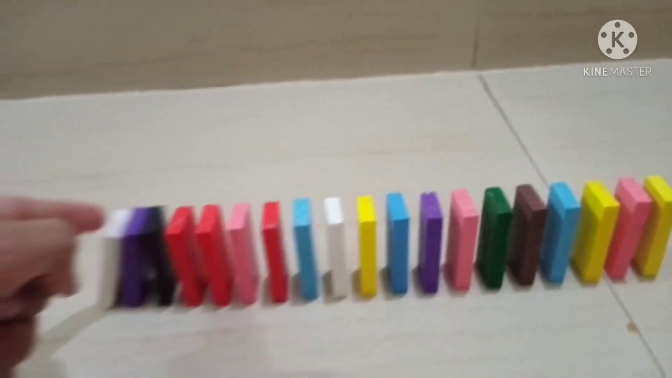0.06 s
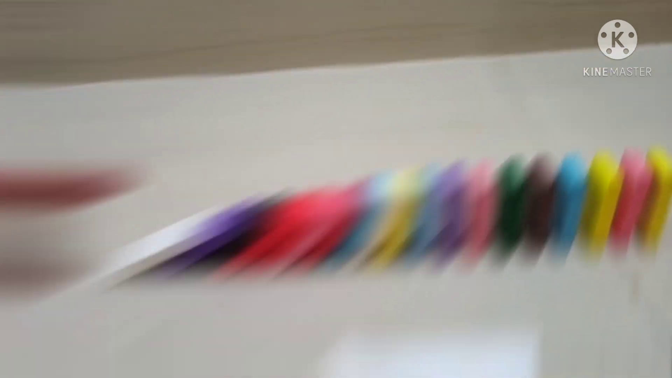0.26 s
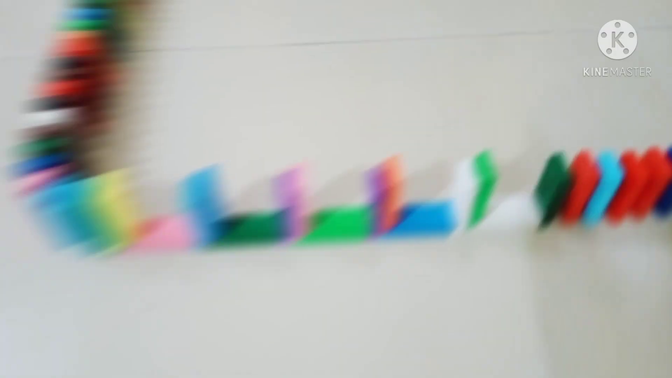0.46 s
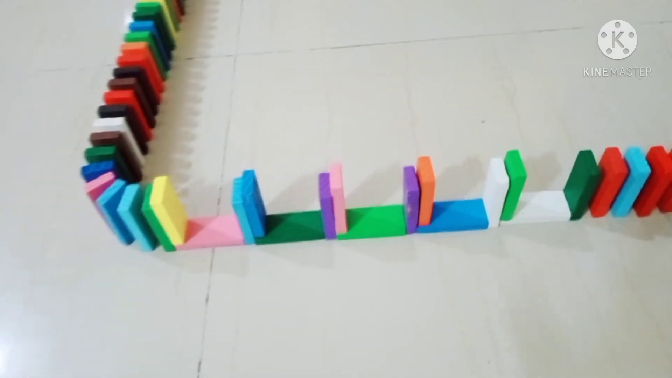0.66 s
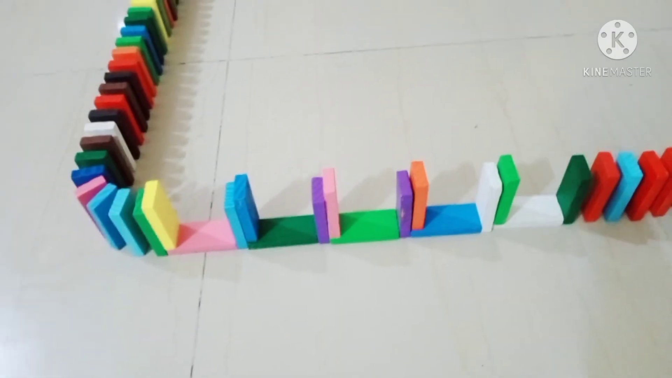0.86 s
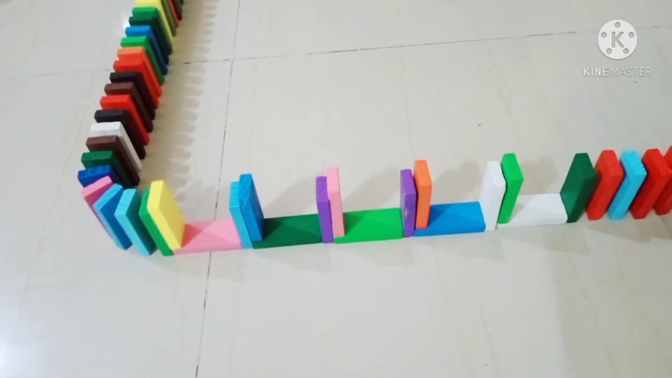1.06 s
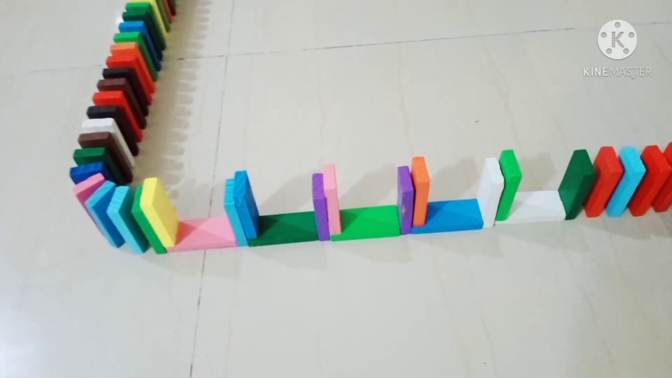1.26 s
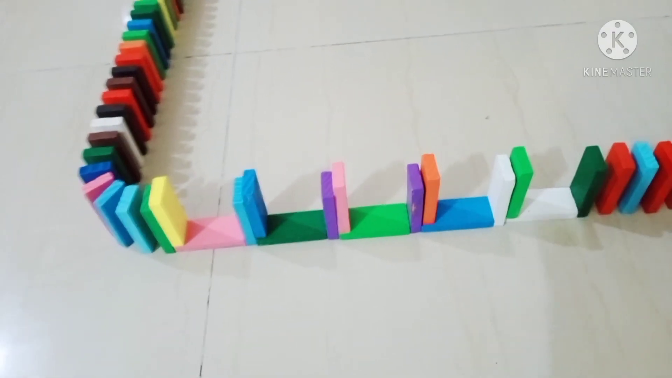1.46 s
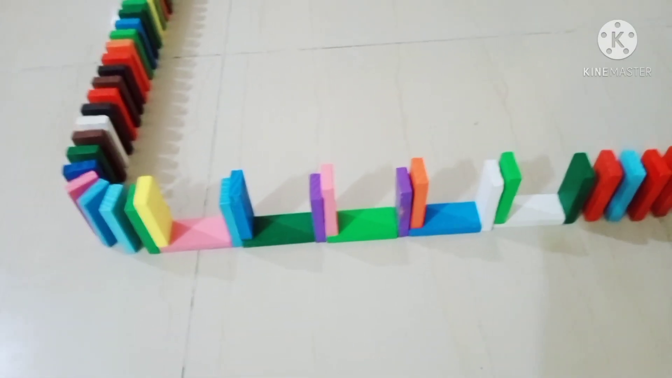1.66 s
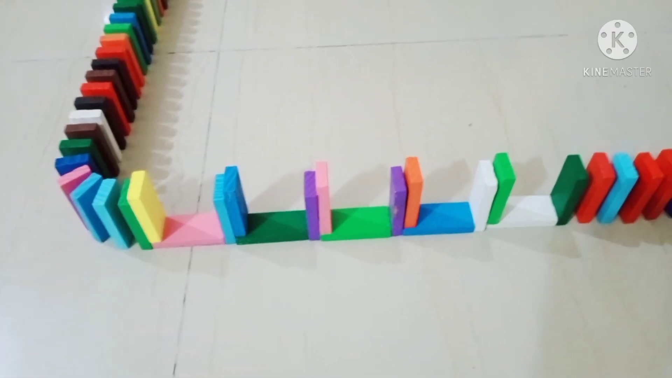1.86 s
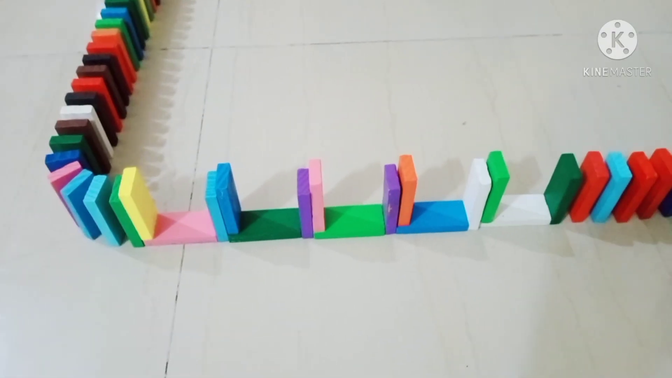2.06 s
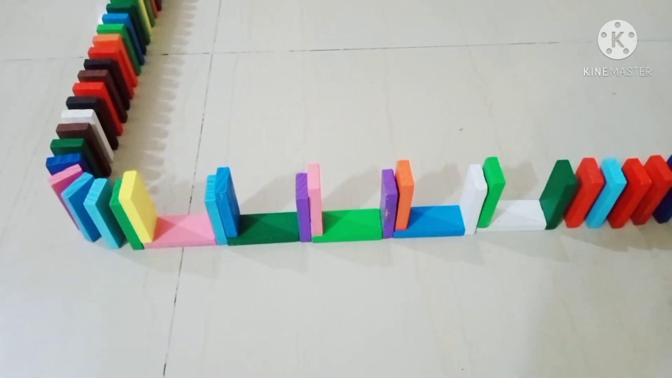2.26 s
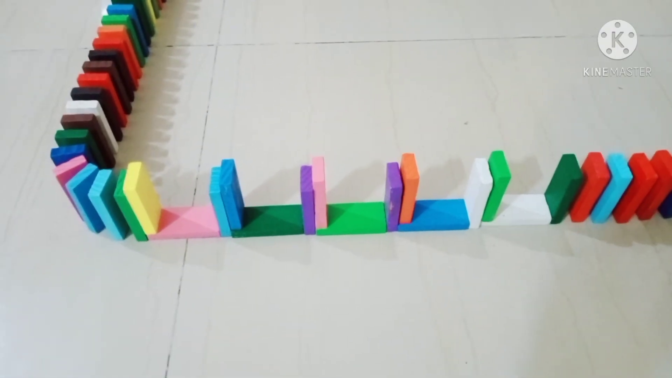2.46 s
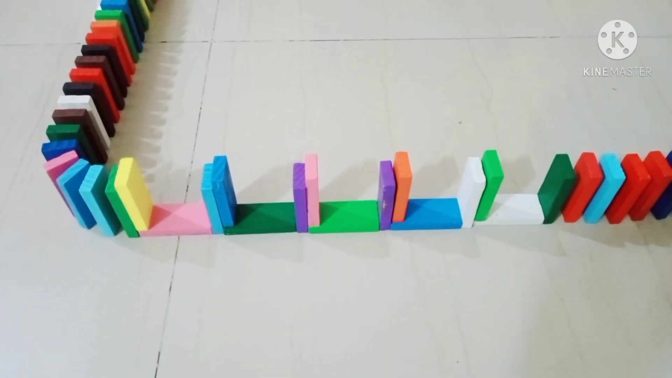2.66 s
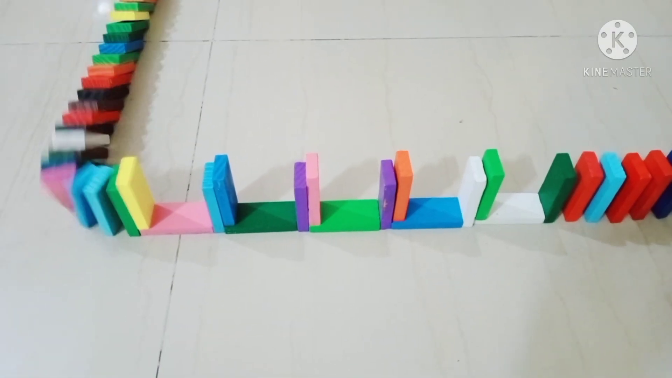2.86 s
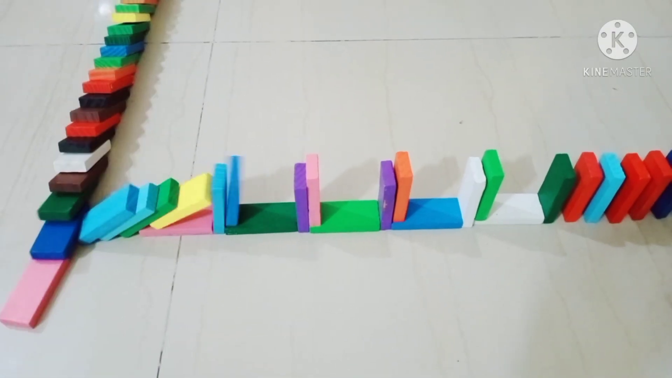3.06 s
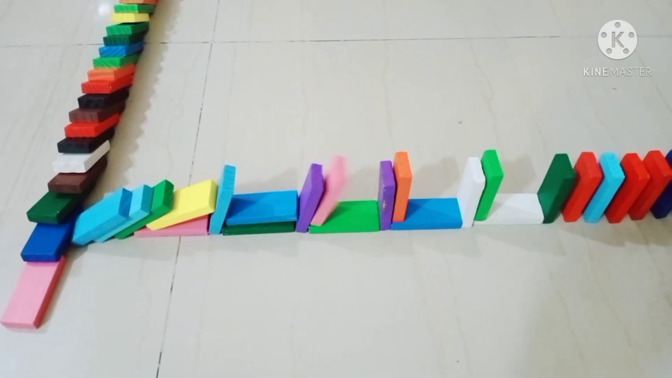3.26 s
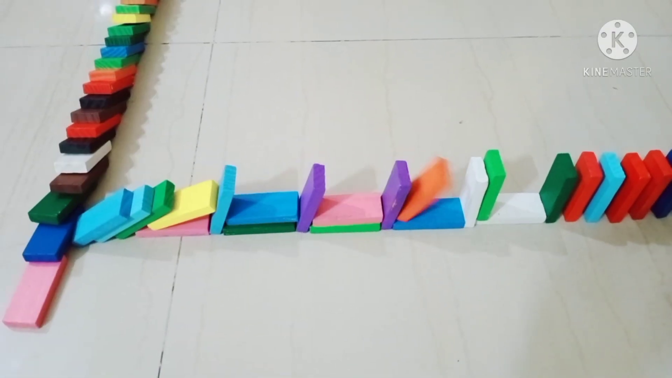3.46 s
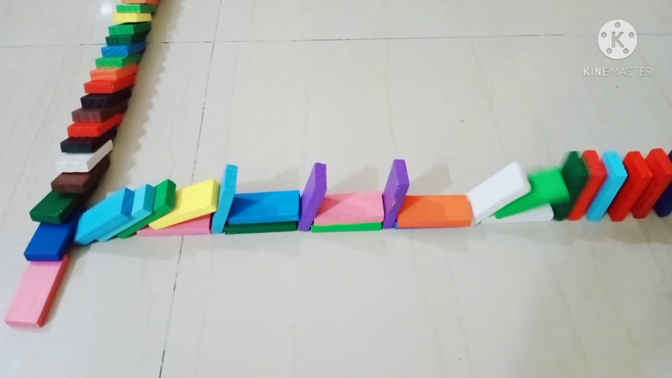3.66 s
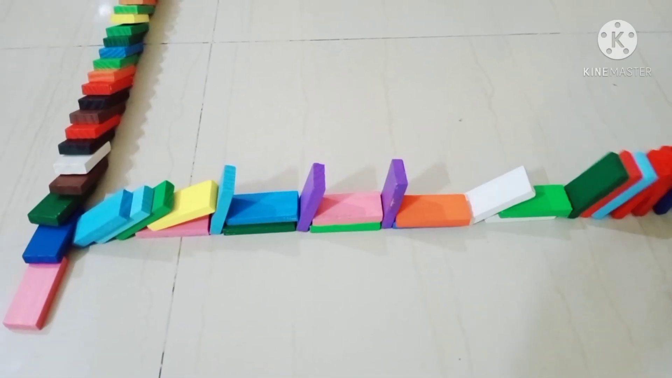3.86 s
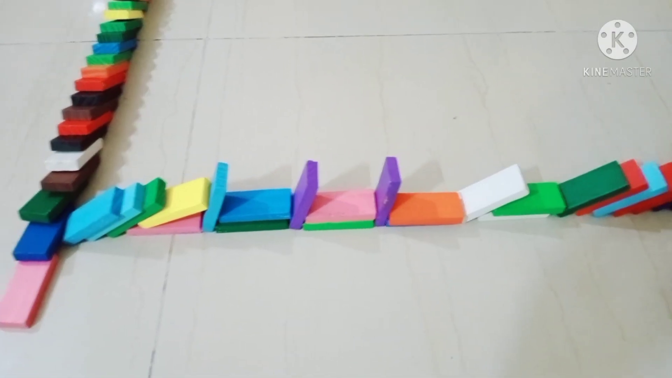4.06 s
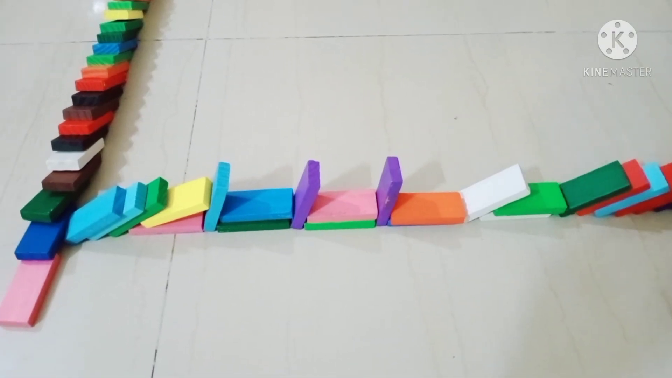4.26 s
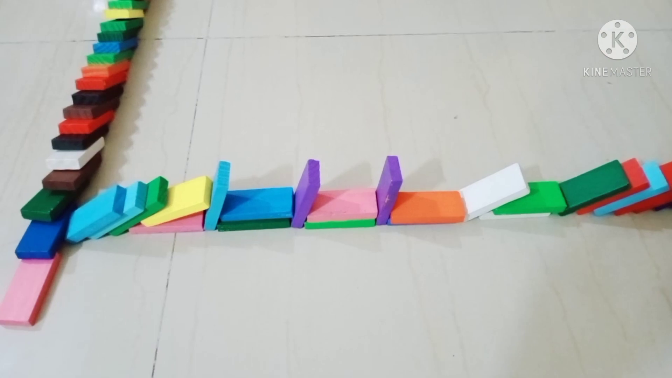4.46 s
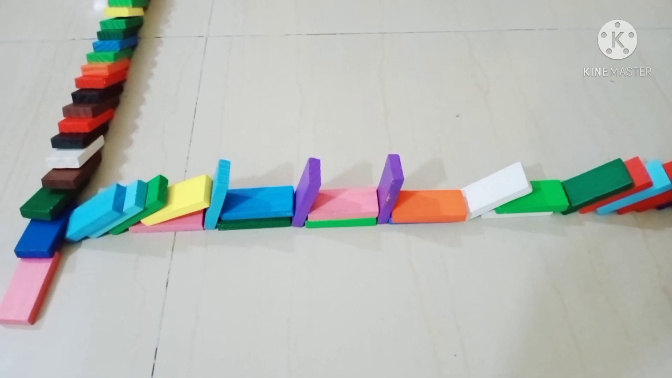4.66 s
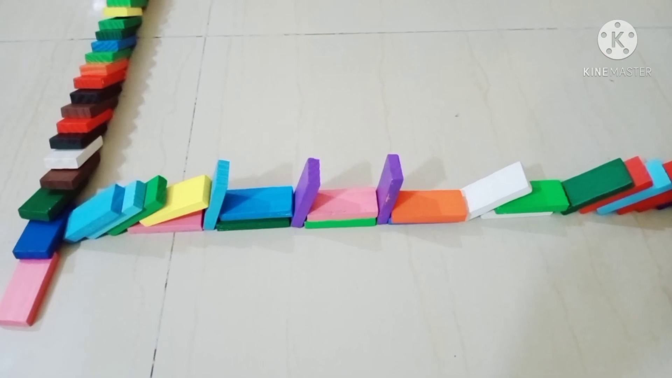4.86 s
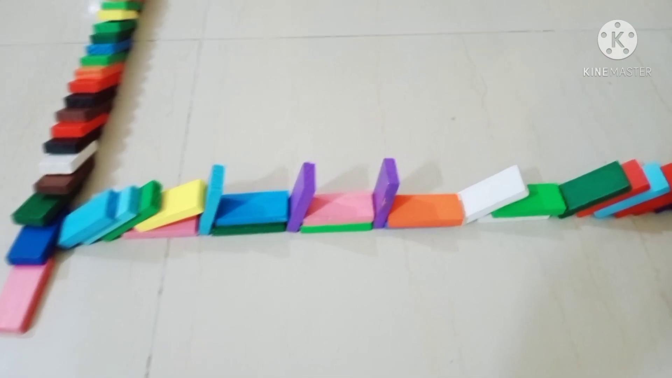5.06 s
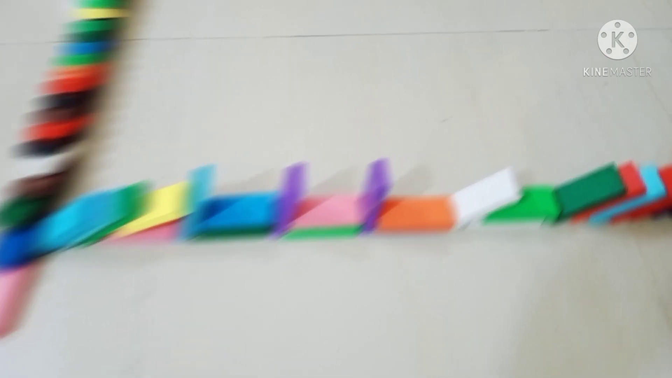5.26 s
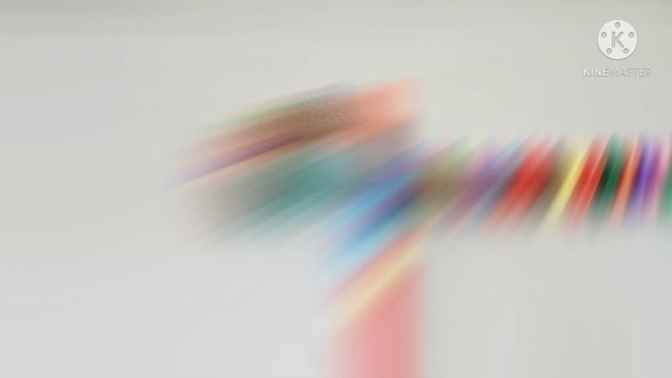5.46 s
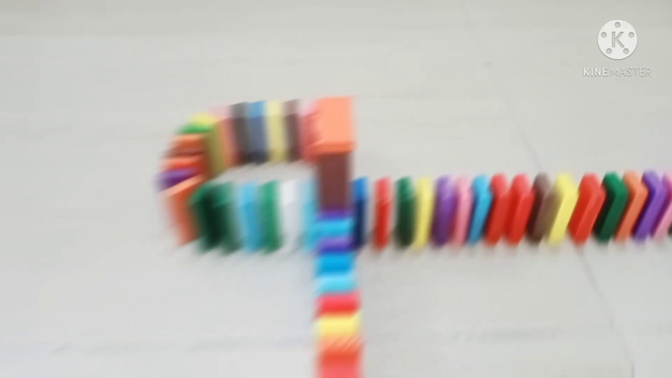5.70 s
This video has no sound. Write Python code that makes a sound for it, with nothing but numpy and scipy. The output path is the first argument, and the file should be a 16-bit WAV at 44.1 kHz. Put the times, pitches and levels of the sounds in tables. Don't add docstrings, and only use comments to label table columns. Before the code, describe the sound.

Three quick runs of sharp plastic domino clicks ring in a bare tiled room, separated by near-quiet, with one hard microphone knock.

```python
import sys
import numpy as np
from scipy import signal
from scipy.fft import rfft, irfft
from scipy.io import wavfile
from scipy.ndimage import uniform_filter1d

SR = 44100
rng = np.random.default_rng(int(sys.argv[2]) if len(sys.argv) > 2 else 0)


def generate_wav(sig):
    pcm = np.round(np.clip(np.atleast_2d(sig).T, -1, 1) * 32767).astype(np.int16)
    wavfile.write(sys.argv[1], SR, pcm)


def voltage_ratio(level):
    return 10 ** (np.asarray(level, float) / 20)


N = 252693
TIME = np.arange(N) / SR
CUT_S = .5095

# f/Hz, level/dB
SHEEN = [(5000, -32), (6500, -17), (7800, -5.5), (8800, -1.5), (10300, -14.5), (12000, -28.5), (15000, -38),
         (16500, -44.5)]
# f/Hz, level/dB
FAR_BODY = [(300, -12.5), (1000, -15), (1700, -4), (2600, -0.5), (3800, -8), (5000, -13.5), (8000, -6.5)]
# f/Hz, level/dB
ROW_BODY = [(300, -23.5), (1500, -15.5), (3500, -4), (5500, -4), (8000, -3), (11000, -20), (14000, -29)]


def shape(x, points):
    hz, db = np.transpose(points)
    log_hz = np.log(np.linspace(1, SR / 2, 1025))
    log_gain = np.interp(log_hz, np.log(hz), db) * np.log(10) / 20
    cepstrum = irfft(log_gain)
    cepstrum[1:1024] *= 2
    cepstrum[1025:] = 0
    return signal.fftconvolve(x, irfft(np.exp(rfft(cepstrum))))[:len(x)]


def band(x, lo_hz, hi_hz):
    y = signal.sosfilt(signal.butter(2, [lo_hz, hi_hz], "bandpass", fs=SR, output="sos"), x)
    return y / np.std(y)


def gains(rows):
    s, db = np.transpose(rows)
    inside = np.clip(np.minimum(TIME - s[0], s[-1] - TIME) / .02, 0, 1)
    return inside * voltage_ratio(np.interp(TIME, s, db))


def swell(peak_s, rise_s, fall_s, db):
    return voltage_ratio(db - 20 * np.maximum((peak_s - TIME) / rise_s, (TIME - peak_s) / fall_s))


def walk(rate):
    k = int(SR / rate)
    steps = np.repeat(rng.standard_normal(N // k + 1), k)
    w = uniform_filter1d(uniform_filter1d(steps, k), k)[:N]
    return w / np.std(w)


def ring(t, hz, t60, phase):
    build = 1 - np.exp(-t / .0003)
    return build * np.exp(-np.log(1000) * t / t60) * np.sin(2 * np.pi * (hz * t + phase))


def burst(sizes, length_s, colour):
    envelope = signal.lfilter([1], [1, -np.exp(-1 / (length_s * SR))], sizes)
    return shape(envelope * np.sign(rng.standard_normal(N)), colour)


def blows():
    # t/s, peak/dB, main mode f/Hz, upper mode f/Hz, upper level/dB re peak
    first_row = [(0.0827, -49, 10310, 10510, -8.5), (0.086, -39.5, 8400, 10510, -9.0),
                 (0.0918, -52.0, 8400, 10510, -11), (0.1146, -38.5, 10300, 10400, -9.5),
                 (0.1269, -50.0, 9710, 10510, 0.0), (0.159, -32.5, 9750, 13000, -13.5),
                 (0.173, -39.5, 9700, 13090, -8.5), (0.199, -35, 9650, 10510, -6.0),
                 (0.2279, -30, 9550, 13000, -7.0), (0.2446, -51, 9400, 12580, -20),
                 (0.2502, -37, 9860, 14660, -11), (0.2583, -22, 9700, 14710, -23),
                 (0.2657, -41, 10000, 11090, -8.5), (0.2748, -25, 8900, 11150, 2),
                 (0.2866, -30.5, 9800, 11130, -5.5), (0.2974, -32, 8700, 11180, -17),
                 (0.304, -22.5, 9700, 11200, -12.5), (0.3139, -48, 9840, 10680, -14.0),
                 (0.318, -20, 8900, 11240, -7), (0.322, -29, 8300, 10570, -9.0),
                 (0.3355, -14, 10200, 10800, -5), (0.339, -23, 9300, 11400, 1),
                 (0.3567, -21.5, 10300, 10570, 0.5), (0.3655, -18, 9100, 11930, -9.5),
                 (0.3702, -18, 9100, 10510, -13.0), (0.373, -15.5, 9170, 10510, -23),
                 (0.396, -19, 8700, 12360, -1), (0.4006, -16, 7900, 12380, -17.0),
                 (0.4032, -11, 9110, 12250, -20), (0.4124, -21, 7900, 11950, -7.5),
                 (0.4187, -13.5, 8440, 11960, -6), (0.4258, -22, 7760, 11520, -14.0),
                 (0.4324, -14.5, 7970, 11710, -8.5), (0.4445, -9, 9100, 13700, -15),
                 (0.4471, -11.5, 8950, 11800, -4), (0.4574, -24.0, 9300, 11700, 0),
                 (0.47, -30, 8900, 11650, -16.0), (0.4815, -34, 8900, 11410, 0.5),
                 (0.4908, -45, 8590, 11630, -14.5), (0.5086, -27, 7900, 12500, -9.0)]
    long_row = [(2.4278, -17.5, 9450, 14000, -36), (2.4545, -42, 9000, 11240, -26.5),
                (2.4629, -23.5, 9540, 10530, -20), (2.4889, -22.5, 9670, 12040, -15.5),
                (2.4996, -45, 8910, 11720, -20.5), (2.5067, -30, 8400, 11860, -21.0),
                (2.512, -34, 8400, 11860, 2), (2.5255, -33, 8200, 11460, -14),
                (2.5314, -16, 8300, 14770, -24), (2.543, -23, 8200, 11540, -11),
                (2.547, -12, 8420, 13460, -19.5), (2.5573, -17.5, 8270, 10530, -13),
                (2.5718, -11, 7940, 11580, -9), (2.5867, -16.5, 7900, 11960, -15.5),
                (2.5983, -16, 9780, 11520, -16), (2.6044, -17, 7840, 14490, -16.5),
                (2.6092, -23, 8600, 11500, -13), (2.6133, -22, 9700, 11460, -22.0),
                (2.627, -7.5, 8880, 13720, -19), (2.659, -26, 9200, 14880, -20.5),
                (2.6635, -11.5, 9250, 11320, -20), (2.674, -12, 9350, 15270, -16),
                (2.6792, -23, 9500, 15310, -20.5), (2.6852, -15, 7740, 12260, -12.5),
                (2.6903, -17, 9370, 10750, -16.5), (2.7002, -18.5, 8500, 11130, -15.0),
                (2.7079, -20, 9780, 12830, -6), (2.712, -13, 7670, 10790, -11),
                (2.7156, -12.5, 9800, 11090, -15.0), (2.7235, -8, 8600, 12800, -15),
                (2.7399, -4.5, 9000, 11150, -30), (2.744, -9.5, 8500, 11350, -14),
                (2.7612, -10.0, 8500, 14130, -12), (2.774, -14, 8650, 11780, -21.0),
                (2.7822, -21, 9100, 11720, -9), (2.7895, -9.5, 8800, 11890, -24.5),
                (2.798, -14.5, 8770, 11700, -12), (2.8021, -23, 8900, 10810, -17.5),
                (2.8132, -13, 8700, 10510, -14), (2.8335, -23.5, 7300, 14200, -20.5)]
    last_row = [(3.8685, -31, 9110, 10920, 8.5), (3.873, -29, 9110, 11400, 1.5),
                (3.8897, -15, 8850, 15200, -13.0), (3.894, -20, 9200, 11220, -12.0),
                (3.906, -35.5, 9000, 10900, -18), (3.9118, -32, 8960, 11050, -19),
                (3.9167, -18.0, 10100, 10400, -13.0), (3.9193, -16.5, 9070, 10510, -16),
                (3.9358, -18.5, 8900, 15220, -16), (3.939, -7.5, 8940, 10300, -12.5),
                (3.9612, -1.5, 8680, 12470, -16.5), (3.9677, -14.5, 8760, 11050, -31),
                (3.9987, -12, 8800, 11600, 0), (4.0168, -4, 8780, 15750, -4.5),
                (4.0273, -9.5, 8950, 14600, -14.5), (4.0363, -6, 8930, 15000, -4.5),
                (4.0433, -12, 9040, 14700, -8), (4.0487, -17.5, 8200, 14860, -16.0),
                (4.064, -18, 9100, 14940, -10), (4.0724, -19.0, 8940, 14660, -17.5),
                (4.0884, -21, 8900, 15010, -18.5), (4.0955, -23, 8960, 14040, -23.5),
                (4.1027, -11, 8830, 15200, -21.5), (4.1065, -20.5, 8940, 11050, -25.5),
                (4.112, -19.5, 8360, 11800, -3.5), (4.1179, -18, 8870, 10510, -21),
                (4.1295, -10, 8280, 10400, -22.0), (4.1425, -7.5, 8750, 13300, -10.5),
                (4.1629, -13.5, 8420, 11050, -22), (4.1663, -12.5, 8300, 11100, -4.5),
                (4.1768, -16, 8630, 11370, -5.0), (4.1812, -13.5, 8180, 11000, -17),
                (4.1884, -24.5, 8460, 11220, -15.0), (4.204, -10, 8950, 11600, -14),
                (4.2102, -19.5, 8500, 10850, -19), (4.2443, -10, 8460, 11070, -21),
                (4.2471, -5, 8460, 11600, -9), (4.2529, -13, 7300, 13950, -16.5),
                (4.263, -6.5, 8600, 14100, -5.5), (4.2765, -12.5, 9460, 13630, -11)]
    corner = [(2.866, -37, 8000, 11000, -20), (2.873, -13, 8740, 10900, -9),
              (2.9019, -5.5, 9690, 14800, -9.5), (2.908, -12, 8640, 13600, -11),
              (2.9145, -20.5, 8900, 12500, -3.5), (2.9205, -23, 7900, 14750, -2),
              (2.933, -28, 8900, 14500, -10), (0.3862, -15, 9300, 12300, -6),
              (3.978, -17.5, 8860, 14500, -17), (3.9855, -17, 8700, 13500, -13.5),
              (4.0125, -12.5, 8900, 12500, -6), (2.6452, -17, 8640, 11500, -22)]
    # t/s, peak/dB, main mode f/Hz, body level/dB re peak
    steps = [(3.0, -18.5, 7980, -4), (3.1342, -13, 8880, -10.5), (3.156, -24, 8440, -9.5),
             (3.179, -38, 8300, -3), (3.3028, -20, 7920, 3.5), (3.3155, -36, 7600, -3.5),
             (3.33, -27, 8300, 6.5), (3.3505, -26, 8530, -4.5), (3.4756, -19.5, 8630, -7),
             (3.4869, -17.5, 8590, -13), (3.4997, -32, 8400, -24), (3.5083, -38.5, 8900, -20.5),
             (3.5238, -6.5, 8750, -15.5), (3.5439, -33.5, 8300, -12), (3.5574, -33.5, 8400, -15.5),
             (3.5748, -34.5, 9000, -16), (3.5823, -28.5, 8700, -14), (3.6011, -27.5, 8100, -15),
             (3.6266, -19, 9050, 0.5), (3.6343, -16, 8460, -12), (3.6437, -19.5, 8800, -17),
             (3.6518, -19, 8900, -8), (3.6794, -12.5, 9270, -7), (3.701, -24, 9250, -17),
             (3.7133, -29, 9000, -11), (3.7916, -43.5, 8600, -13.5), (3.826, -37.5, 9000, -11)]
    # t/s, peak/dB, main mode f/Hz, body level/dB re peak
    stray = [(1.2343, -51.5, 8700, 0.5), (1.9571, -54, 9800, -27), (1.9661, -56, 9770, -22),
             (2.2006, -18.5, 8510, -25), (2.2332, -36, 7980, -26), (2.2578, -44, 8800, -21),
             (2.2892, -41, 9500, -10), (2.3857, -37, 7640, -15), (2.411, -64, 8700, -11),
             (4.875, -50, 10100, -22), (5.5454, -65, 8900, 11.5), (5.7044, -65, 8970, 12),
             (2.298, -48, 9600, -25), (2.314, -48, 9400, -25)]
    # t/s, upper mode f/Hz, level/dB re peak
    ringers = [(2.2006, 14200, -28), (2.3857, 14200, -16), (3.1342, 10600, -12), (3.4756, 12500, -14),
               (3.4869, 14500, -19.5), (3.5238, 13880, -25), (3.6266, 14470, -13), (3.6343, 14770, -13),
               (3.6437, 13200, -11), (3.6794, 14030, -17), (3.7133, 13100, -13.5), (3.7916, 14230, -4.5),
               (3.826, 14520, -6)]

    rows = []
    for table, body_db in zip((first_row, long_row, last_row, corner), (-19, -25, -27.5, -21)):
        rows += [(*row, body_db) for row in table]
    body_scatter_db = 5
    scatter = np.outer(rng.standard_normal(len(rows)), [0, 0, 0, 0, 0, body_scatter_db])
    rows = np.array(rows) + scatter

    lone = []
    for table, upper_db in ((steps, -23), (stray, -29.5)):
        for s, db, hz, body_db in table:
            lone.append((s, db, hz, rng.uniform(10600, 11500), upper_db, body_db))
    lone = np.array(lone)
    for at, ringer_hz, ringer_db in ringers:
        lone[np.argmin(abs(lone[:, 0] - at)), 3:5] = ringer_hz, ringer_db
    return np.vstack([rows, lone])


def collisions():
    # f/Hz, level/dB
    near_body = [(200, -49), (900, -42), (1800, -18.5), (3000, -3), (4000, 2), (5000, -2), (6300, 3.5),
                 (8000, -5), (12000, -37)]
    top = [(6000, -22.5), (10000, -9.5), (12000, -10.0), (16500, -7.5)]
    hits = blows()
    chance = rng.random((len(hits), 4))
    t = np.arange(1000) / SR
    modes, uppers, sheen, bright, dull = np.zeros((5, N))
    for (s, db, main_hz, upper_hz, upper_db, body_db), u in zip(hits, chance):
        i = int((s - .0002) * SR)
        plate = ring(t, main_hz, 0.013, u[0])
        plate += .5 * ring(t, main_hz * (.93 + 0.12 * u[1]), 0.011, u[2])
        upper = voltage_ratio(upper_db + 4.5) * ring(t, upper_hz, 0.0066, u[3])
        modes[i:i + len(t)] += voltage_ratio(db + .3) * plate
        uppers[i:i + len(t)] += voltage_ratio(db + 1.2) * upper
        sheen[i] += voltage_ratio(db)
        bright[i] += voltage_ratio(db + upper_db)
        dull[i] += voltage_ratio(db + body_db)

    answered = dull + .35 * np.roll(dull, int(.0015 * SR))
    first = TIME < CUT_S
    near = (TIME > 2.86) & (TIME < 3.78)
    body = voltage_ratio(20.0) * shape(answered * near, near_body)
    body += voltage_ratio(11.0) * burst(answered * ~first * ~near, 0.0014, ROW_BODY)
    body += voltage_ratio(4.5) * burst(answered * first, 0.0013, FAR_BODY)
    sheen_click = shape(sheen, SHEEN)
    direct = modes + uppers + body + voltage_ratio(13.0) * sheen_click
    direct += voltage_ratio(-1.0) * burst(sheen, 0.0042, SHEEN)
    direct += voltage_ratio(5.0) * burst(bright, 0.00081, top)

    plain = np.where(first, shape(dull, FAR_BODY), shape(dull, ROW_BODY))
    walls = voltage_ratio(-2) * (modes + voltage_ratio(2.0) * uppers) + voltage_ratio(23.5) * sheen_click
    walls += voltage_ratio(21) * plain + voltage_ratio(10) * shape(bright, top)
    return direct, walls


def rattle():
    # t/s, level/dB
    slides = [
        [(0.08, -64), (0.142, -80), (0.274, -56), (0.382, -45.5), (0.44, -51.5), (0.52, -60)],
        [(2.42, -68), (2.494, -37), (2.604, -24), (2.684, -29.5), (2.734, -25), (2.95, -44.5)],
        [(3.86, -37), (3.936, -30.5), (4.07, -29), (4.168, -23.5), (4.42, -36.5), (4.75, -63)],
    ]
    rate = 1300 / SR
    ticks = (rng.random(N) < rate) * voltage_ratio(1.6 * rng.exponential(size=N))
    ticks = np.where(TIME < 4.28, ticks, np.sqrt(rate)) * rng.standard_normal(N)
    sheen = shape(ticks, SHEEN)
    body = np.where(TIME < CUT_S, shape(ticks, FAR_BODY), shape(ticks, ROW_BODY))
    sheen = sheen / np.std(sheen)
    body = body / np.std(body)
    out = np.zeros(N)
    for run, body_db in zip(slides, (3.5, -17, -18.5)):
        out += gains(run) * (voltage_ratio(-8.0) * sheen + voltage_ratio(body_db) * body)
    return out


def landings():
    # t/s, peak/dB, body mode f/Hz
    flat_tiles = [(2.813, -15, 7000), (2.8656, -24, 4080), (2.8726, -12, 5800), (2.9865, -34, 4500),
                  (2.9985, -24, 3050), (3.1344, -18, 8000), (3.1352, -25, 4070), (3.3012, -24, 5270),
                  (3.3318, -27, 3970), (3.3516, -22, 3980), (3.5236, -10.5, 7340), (3.626, -24, 3880),
                  (3.6447, -27, 3070), (3.6797, -10.5, 7030)]
    t = np.arange(200) / SR
    port = 0.03 * np.exp(-t / 0.00036) * np.sin(2 * np.pi * 8900 * t)
    slap = np.exp(-t / .0003)
    out = np.zeros(N)
    for s, db, hz in flat_tiles:
        out[int(s * SR):][:len(t)] += voltage_ratio(db + 4) * (slap * np.sin(2 * np.pi * hz * t) + port)
    return out


def thuds():
    # t/s, peak/dB, f/Hz
    later = [(2.4274, -44.5, 3080), (2.4639, -43, 5600), (2.5067, -42.0, 3810), (2.513, -39, 3770),
             (2.5302, -42, 3570), (2.5465, -35.5, 3850), (2.5595, -32.0, 3810), (2.5726, -29, 6290),
             (2.5991, -34, 5710), (2.619, -30, 3900), (2.645, -40, 2710), (2.672, -36, 5430),
             (2.6897, -37, 3340), (2.6956, -27, 5400), (2.7014, -27, 5900), (2.7083, -29.5, 4260),
             (2.7424, -39, 5620), (2.7547, -33.5, 6290), (2.7895, -31.5, 3640), (2.796, -26.5, 3750),
             (3.8729, -38, 3250), (3.8903, -26.5, 3230), (3.9181, -28.5, 3790), (3.9244, -42.5, 3170),
             (3.9314, -32.5, 2630), (3.938, -30.5, 4310), (3.9594, -29, 2760), (3.984, -27, 3620),
             (3.9978, -34, 5790), (4.0034, -26, 3400), (4.0125, -25.5, 3340), (4.034, -41, 6290),
             (4.0484, -32, 3550), (4.0763, -35.5, 3900), (4.1019, -36, 3290), (4.115, -39.5, 3570),
             (4.127, -31.5, 3570), (4.142, -32.5, 3700), (4.152, -38.5, 2910), (4.177, -34, 3680),
             (4.1812, -34, 4370), (4.1938, -37, 3790), (4.1997, -37, 4460), (4.2472, -24.5, 5730),
             (4.2632, -23.5, 2970)]
    # t/s, peak/dB, f/Hz
    far = [(0.1593, -45, 3230), (0.1993, -37.5, 1920), (0.227, -37.5, 1990), (0.2498, -39, 1990),
           (0.274, -42, 1600), (0.365, -40, 2710), (0.3847, -40, 2950), (0.4016, -32, 3450),
           (0.4115, -33.5, 2590), (0.4262, -34, 2140), (0.4335, -29, 2430), (0.4436, -36, 2700),
           (0.4512, -36, 2670), (0.4935, -38, 3050), (0.507, -37, 1450)]
    bodies = [*later, *far]
    t = np.arange(600) / SR
    out = np.zeros(N)
    for (s, db, hz), phase in zip(bodies, rng.random(len(bodies))):
        out[int(s * SR):][:len(t)] += voltage_ratio(db + 3.5) * ring(t, hz, 0.0057, phase)
    return out


def knocks():
    # t/s, peak/dB
    bumps = [
        (.5274, -6),
        (2.9012, -26),
        (3.5238, -28),
    ]
    case = [(500, -61.0), (2500, -10.5), (4800, -19.5), (6500, -13.5), (8500, 2.0), (11500, -15.5),
            (14500, -3.0), (16500, -13.5)]
    jolts = np.zeros(N)
    for s, db in bumps:
        jolts[int(s * SR)] = voltage_ratio(db)
    t = np.arange(3000) / SR
    swing = -.5 * np.exp(-t / .0055) * np.cos(2 * np.pi * 98 * t + .55)
    push = (1 - np.exp(-t / 0.0001)) * (swing - 0.77 * np.exp(-t / 0.00047))
    buzz = voltage_ratio(13.5) * shape(jolts * (TIME < 1), case)
    since = np.clip(TIME - 5.2705, 0, None)
    tap = ring(since, 1450, .012, 0) + ring(since, 800, .009, 0) + ring(since, 350, .015, 0)
    return signal.fftconvolve(jolts, push)[:N] + voltage_ratio(-35) * tap, buzz


def room(x):
    # f/Hz, T60/s
    room_t60 = [(1000, 0.15), (4000, 0.63), (9000, 0.45), (15000, 0.44)]
    t = np.arange(int(.7 * SR)) / SR
    hz, t60 = np.transpose(room_t60)
    tail = 0
    for centre in 700 * 2 ** np.arange(0, 4.6, .5):
        decay_s = np.interp(np.log(centre), np.log(hz), t60)
        noise = band(rng.standard_normal(len(t)), centre / 1.19, centre * 1.19)
        tail = tail + (centre / 8000) ** 0.076 * noise * np.exp(-np.log(1000) * t / decay_s)
    uneven = np.repeat(rng.standard_normal(len(t)), 60)[:len(t)]
    tail *= np.clip(t / .005, 0, 1) * voltage_ratio(2.5 * np.exp(-t / .03) * uneven)
    return signal.fftconvolve(x, tail[None], axes=1)[:, :N]


def sine(hz):
    return np.sqrt(2) * np.sin(2 * np.pi * np.cumsum(hz) / SR)


def machine():
    # f/Hz, peak after/s, rise/s, fall/s, level/dB re stroke
    tones = [
        (158.8, 0.21, 0.2, 0.57, 0.5),
        (259.9, 0.029, 0.039, 0.061, 5),
        (241, 0.14, 0.076, 0.57, -6.5),
        (278, 0.38, .3, 0.39, -6.5),
    ]
    # t/s, level/dB, starting blip/dB
    strokes = [
        (2.434, -46.5, -1.5),
        (4.418, -43.5, 0),
    ]
    # peak t/s, level/dB
    puffs = [
        (.82, -55),
        (1.778, -55.5),
        (5.573, -54),
    ]
    # peak t/s, f/Hz, level/dB
    squeaks = [
        (.93, 1720, -67),
        (1.09, 1800, -58),
        (1.24, 1720, -66),
        (1.88, 1600, -69),
    ]

    hum = np.zeros(N)
    for k, (hz, after, rise, fall, rel_db) in enumerate(tones):
        level = np.zeros(N)
        for s, db, blip_db in strokes:
            level += swell(s + after, rise, fall, db + rel_db + blip_db * (k == 1))
        hum += level * sine(hz * (1 + 0.01101 * walk(13)))

    shaft_hz = 120.2 * (1 + 0.0057 * walk(14.34))
    motor = voltage_ratio(-56.5) * sine(2 * shaft_hz) + voltage_ratio(-59) * sine(3 * shaft_hz)
    motor *= swell(4.96, 0.16, np.inf, 0)

    jet = [(5500, -39), (6600, -7), (7300, 2.5), (8800, 6.0), (10000, -8), (11500, -62)]  # f/Hz, level/dB
    puff = shape(rng.standard_normal(N), jet)
    puff *= sum(swell(s, 0.11, 0.27, db) for s, db in puffs) / np.std(puff)

    waver = 1 + 0.018 * walk(60.9)
    squeak = sum(swell(s, 0.16, 0.16, db) * sine(hz * waver) for s, hz, db in squeaks)
    squeak *= voltage_ratio(5.5 * walk(21) - 0.5)
    return hum + motor + puff + squeak


def hand():
    # peak t/s, rise/s, fall/s, level/dB
    shifts = [
        (1.2, 2.7, 2.8, -64),
        (3.2, 0.68, 0.29, -62),
        (5.3, 1.3, 1.1, -59),
    ]
    grip = sum(swell(*row) for row in shifts)
    deep = band(rng.standard_normal(N), 67, 130)
    rustle = band(rng.standard_normal(N), 4520, 13200)
    return (grip + voltage_ratio(-74)) * deep + grip * voltage_ratio(-8 + 1.5 * walk(39)) * rustle


def air():
    # f/Hz, level/dB per Hz
    floor_colour = [(20, -30), (64, -15), (125, -7), (245, -2.5), (390, -9), (520, -13.5), (700, -7.5),
                    (1500, -13), (3500, -16), (5300, -30.5), (7500, -16), (8800, -6.5), (10500, -26),
                    (15000, -38), (16500, -22.5)]
    # t/s, rumble level/dB
    traffic = [(0.0, -54), (0.99, -55.5), (1.69, -61), (2.47, -57), (2.66, -49), (3.13, -56.5),
               (3.7, -58.5), (3.97, -54.5), (4.08, -51), (4.72, -50), (5.2, -53.5), (5.73, -53.5)]
    noise = shape(rng.standard_normal(N), floor_colour)
    rumble_db = np.interp(TIME, *np.transpose(traffic))
    middle_db = -60.5 + 0.35 * (rumble_db + 56)
    regions = [([105, 660], "band", rumble_db), ([550, 5500], "band", middle_db), (10000, "high", -73)]
    out = np.zeros(N)
    for hz, kind, db in regions:
        part = signal.sosfilt(signal.butter(3, hz, kind, fs=SR, output="sos"), noise)
        out += part / np.std(part) * voltage_ratio(db + 0.18 * walk(19))
    return out


def scene():
    direct, walls = collisions()
    slides = rattle()
    walls = walls + slides
    thud, buzz = knocks()
    snaps = landings() + thuds()
    before = TIME < CUT_S
    tail = room(np.array([walls * before, walls * ~before + 1.6 * buzz + 0.58 * snaps]))
    reverb = voltage_ratio(-48.5) * (tail[0] * before + tail[1])
    return (direct + slides + snaps + thud + buzz + reverb + machine() + air() + hand())[None]


def band_limit(x):
    return signal.sosfilt(signal.butter(12, 16830, fs=SR, output="sos"), x)


def record(dry):
    rounded = np.tanh(.7 * dry) / .7
    mix = signal.sosfilt(signal.ellip(6, .3, 24, 15450, fs=SR, output="sos"), rounded)
    mix = signal.sosfilt(signal.butter(2, 40, "high", fs=SR, output="sos"), mix)
    return band_limit(mix)


dry = scene()
out = record(dry)
generate_wav(out)
```